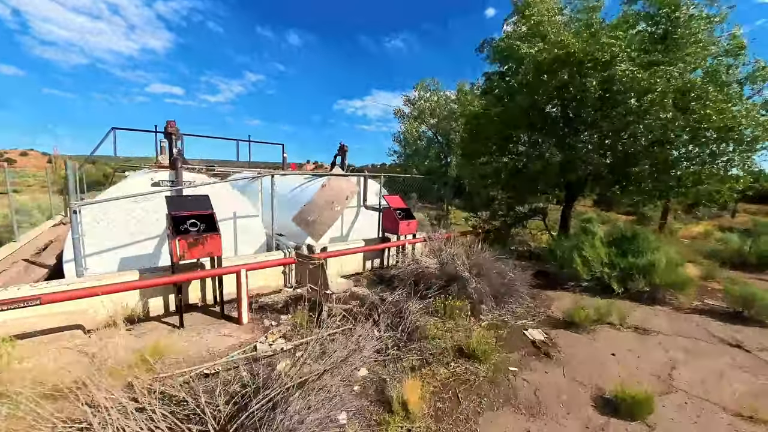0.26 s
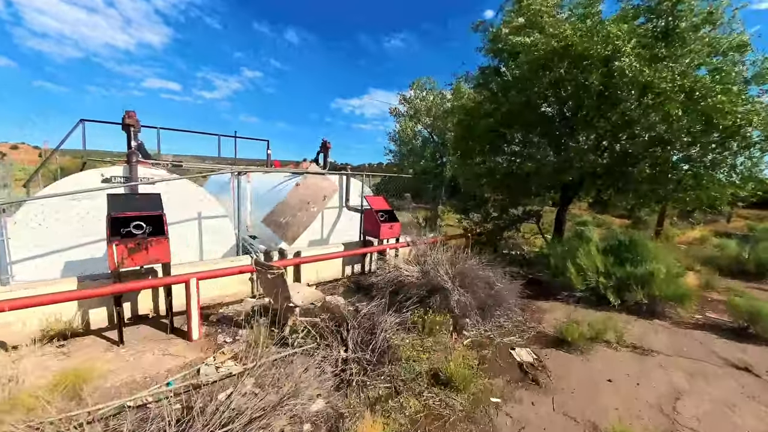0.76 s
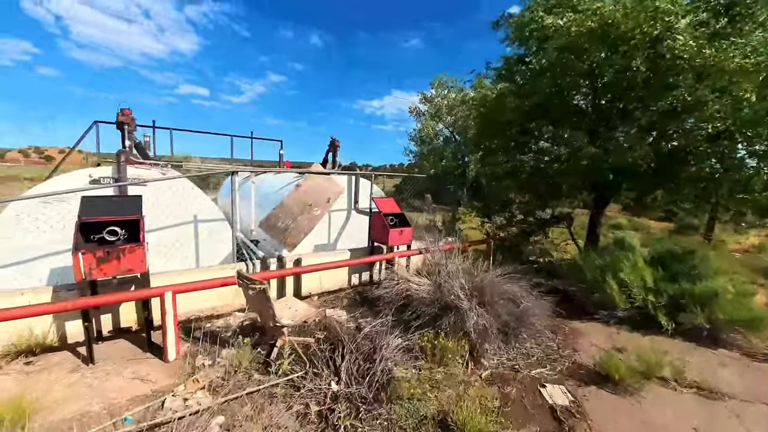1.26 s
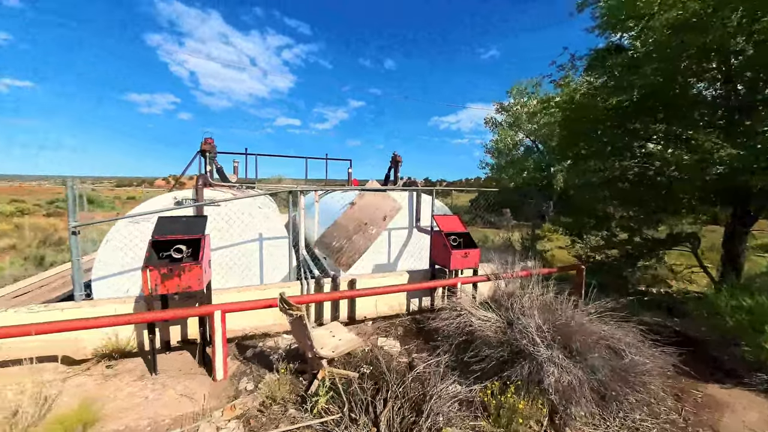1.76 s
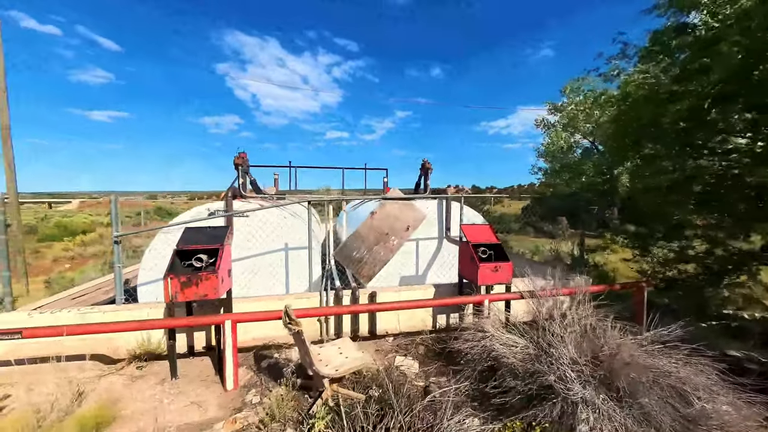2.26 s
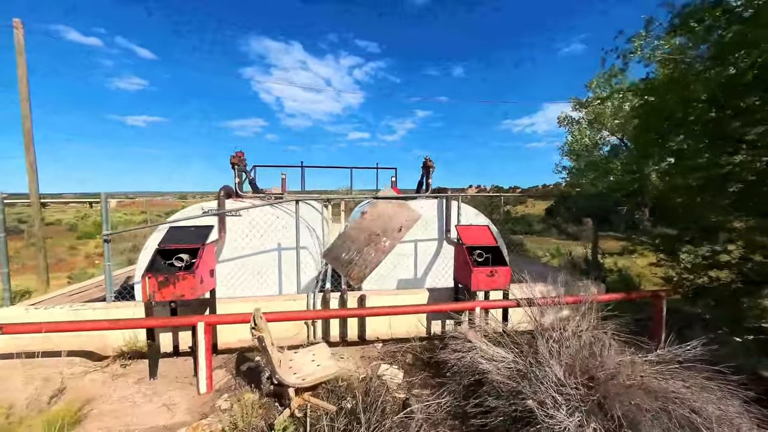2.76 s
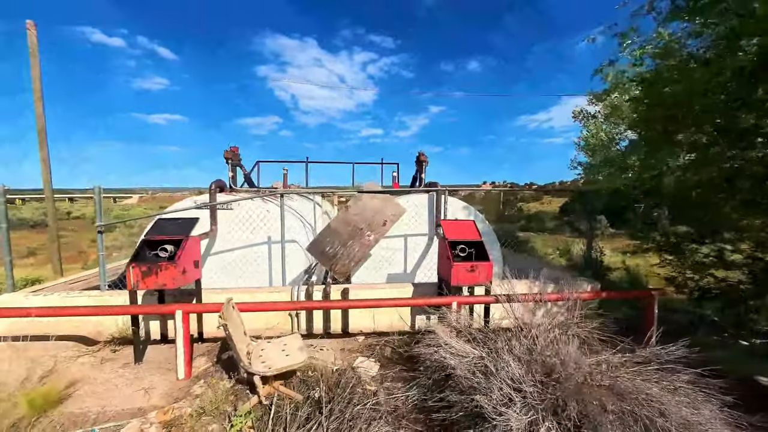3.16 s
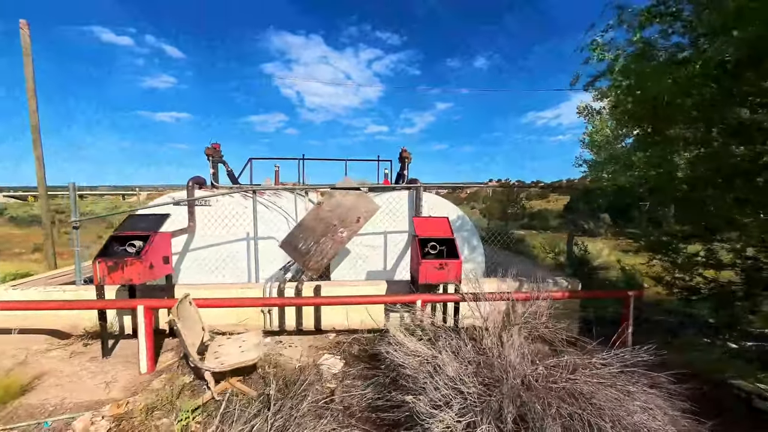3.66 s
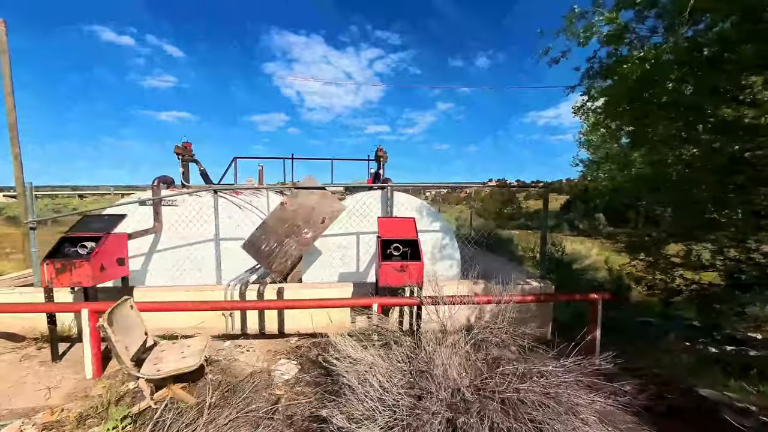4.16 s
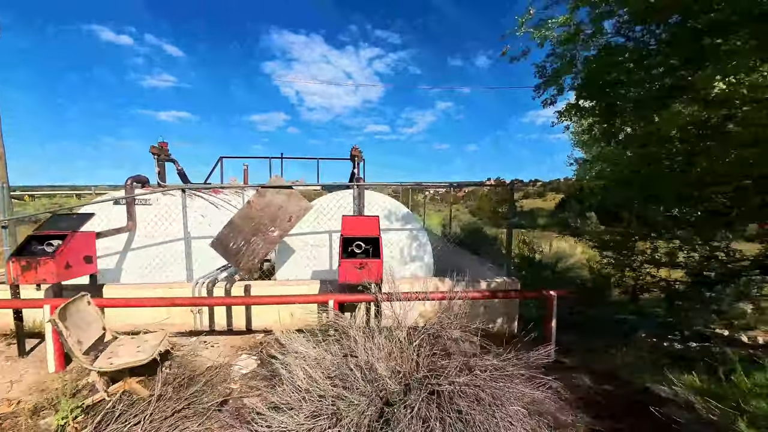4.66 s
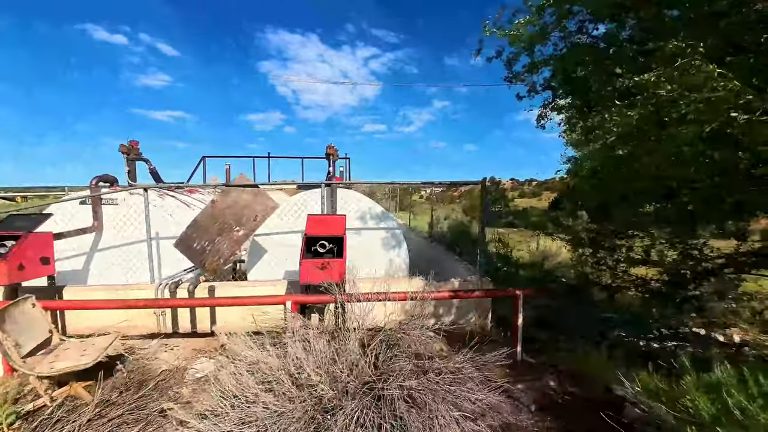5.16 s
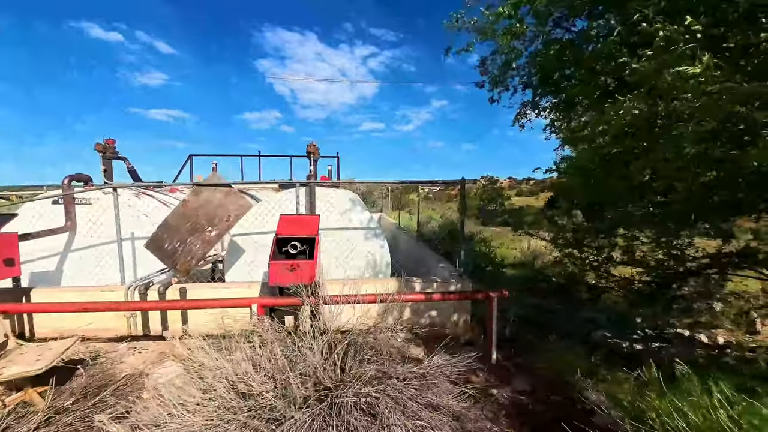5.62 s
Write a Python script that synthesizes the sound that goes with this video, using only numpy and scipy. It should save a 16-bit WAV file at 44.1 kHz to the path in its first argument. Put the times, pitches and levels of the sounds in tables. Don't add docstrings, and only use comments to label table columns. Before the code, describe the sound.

A mono outdoor capture dominated by low frequencies: a droning far-off engine with a wavering exhaust note, soft swelling road noise, and wind buffeting the microphone. Faint higher engine tones come and go. Twigs and grit click sparsely nearby, clustering after about four and a half seconds, when brighter leaf rustle rises. One blunt wind knock comes near the end; treble is thin and faintly hissy.

```python
import sys
import numpy as np
from scipy import signal
from scipy.fft import irfft
from scipy.io import wavfile
from scipy.ndimage import uniform_filter1d

SR = 44100
rng = np.random.default_rng(int(sys.argv[2]) if len(sys.argv) > 2 else 0)


def transcribe(signal):
    frames = np.atleast_2d(signal).T
    limited = np.clip(frames, -1, 1)
    pcm = np.round(limited * 32767).astype(np.int16)
    wavfile.write(sys.argv[1], SR, pcm)


def rack_gain(trim_db):
    fader = np.asarray(trim_db, float)
    return 10 ** (fader / 20)


N = 259749
T = np.arange(N) / SR

# t/s, f/Hz
CRANK_SPEED = [(0, 24.05), (1.2, 23.99), (1.5, 23.85), (2.0, 23.74), (3.3, 23.67), (3.6, 23.58),
               (4.2, 23.5), (5.2, 23.48), (5.89, 23.42)]
# t/s, level/dB
EXHAUST_NOTE = [(0, -24), (.6, -25), (.8, -21), (1.35, -20), (1.6, -24.5), (2.0, -21), (2.35, -16.5),
                (2.8, -18.5), (3.3, -18.5), (3.7, -19), (4.15, -20.5), (4.5, -20.5), (5.2, -20.5),
                (5.89, -23)]
HIGH_ORDERS = (11, 12, 13)
# order, start level/dB, midway level/dB, end level/dB
WEAK_ORDERS = [(4, -42, -38, -35.5), (5, -46.5, -36.5, -41), (8, -34, -37.5, -33.5), (9, -35.5, -42.5, -41)]
# t/s, length/s, rise/dB, f/Hz
FLANK_VIEWS = [(.35, 0.17, 9.5, 284), (.8, 0.11, 11, 284), (1.45, 0.17, 10, 284), (1.85, 0.17, 11, 279.5),
               (2.25, 0.29, 11, 274.8), (2.5, 0.39, 11, 306.4), (2.95, 0.27, 8, 275.6), (3.1, 0.27, 8, 308),
               (3.75, 0.25, 7, 311), (3.8, 0.27, 6, 256), (4.6, 0.32, 9.5, 279)]
# t/s, length/s, change/dB, f/Hz
EDDY_FADES = [(.14, 0.063, -2, 142), (.42, 0.08, -6, 90), (1.4, 0.049, -5, 71), (1.82, 0.052, -8.5, 142),
              (2.0, 0.08, -7, 71), (2.31, 0.14, -12, 71), (2.94, 0.066, -6.5, 142), (3.42, .04, -8, 142),
              (4.03, .12, -8.5, 71), (4.76, 0.078, -11.5, 100), (5.43, 0.056, -4.5, 142),
              (5.74, 0.043, -10, 71)]

# f/Hz, level/dB per Hz
RUMBLE_COLOUR = [(30, -17.5), (60, -4.5), (170, -3.5), (210, -7), (260, -14), (340, -15.5), (420, -30.5),
                 (600, -51.5)]
LOW_ROAR_COLOUR = [(200, -17), (350, -2), (450, -2.5), (650, -3.5), (850, -9), (1200, -24.5), (2000, -44.5)]
ROAR_COLOUR = [(500, -23.5), (800, -2), (1000, -1), (1450, -4.5), (1700, -9.5), (2200, -19.5), (3500, -46)]
HISS_COLOUR = [(1200, -18), (1900, -1.5), (2500, -2.5), (3400, -7), (4300, -15.5), (5500, -29),
               (7000, -43.5)]
# t/s, length/s, swell/dB, f/Hz where it swells most
VEHICLES = [(.05, 0.09, 3, 1494), (.47, 0.23, 7.5, 1480), (.75, 0.21, 5.5, 402), (1.05, 0.14, 4, 452),
            (1.15, 0.48, 2, 1810), (1.7, 0.11, -3, 450), (1.87, 0.13, 5, 2580), (2.08, 0.035, 3, 1510),
            (2.85, 0.13, 4, 1370), (3.5, 0.22, -3.5, 1630), (3.9, .2, 4.5, 490), (4.3, 0.29, 3.5, 2240),
            (4.65, 0.38, 4.5, 673), (4.73, 0.15, 5.5, 2820), (4.98, .1, 7.5, 1990), (5.38, 0.095, -1, 150),
            (3.35, 0.14, 2, 1200), (5.62, .15, -3.5, 700), (5.65, .12, -3, 200), (1.8, .1, 4, 190),
            (5.8, 0.47, -3, 2220)]

# f/Hz, level/dB per Hz
HEAVE_COLOUR = [(1, -14), (4, -7), (8, -4.5), (12, -1), (17, -5), (25, -19.5), (40, -41.5)]
BUFFET_COLOUR = [(10, -23), (18, 0), (22, -8.5), (30, -1), (50, -8), (80, -16), (150, -20.5), (300, -57)]
# t/s, length/s, rise/dB, f/Hz
WIND_GUSTS = [(.05, 0.057, 10.5, 18), (.13, 0.058, 12, 36), (.37, 0.048, 10.5, 36), (.44, 0.061, 13, 17.5),
              (.58, 0.056, 14.5, 28), (.7, 0.034, 3, 46), (1.12, 0.066, 6, 35), (1.33, .08, 6.5, 14),
              (2.05, 0.073, 3, 8.3), (2.3, 0.087, 0, 7.7), (2.77, .06, -11.5, 10), (2.9, .05, 5.5, 15),
              (3.08, .04, 3, 10), (3.23, 0.046, 8.5, 15), (3.35, 0.12, 6.5, 9.3), (3.46, .04, 7, 32),
              (3.75, 0.16, 7, 10), (4.05, 0.033, 5.5, 30), (4.31, 0.054, 8.5, 26), (4.5, 0.27, 7, 14),
              (4.68, 0.072, 4.5, 23), (5.0, 0.24, 8.5, 11), (5.05, 0.052, 9, 21), (5.18, 0.056, 5, 10),
              (5.3, 0.067, 8.5, 43), (5.39, 0.083, 12, 26), (5.71, 0.043, 13, 41), (5.81, 0.063, 19, 14.6)]
# t/s, height level/dB, length/s
GUST_SLAPS = [
    (5.4057, 5.5, 0.0021),
]

# f/Hz, level/dB per Hz
SOUGH_COLOUR = [(3200, -19), (4300, -1), (5000, -0.5), (6000, -4), (7500, -12), (8500, -28.5), (10000, -34)]
RUSTLE_COLOUR = [(5500, -30.5), (7000, -4), (8000, -4), (9650, -5.5), (10000, -14), (11500, -19),
                 (13000, -41.5)]
# t/s, length/s, rise/dB, f/Hz
LEAF_STIRS = [(.1, 0.28, 3.5, 4880), (.58, 0.16, 7.5, 5960), (.95, 0.29, 3.5, 5450), (1.2, .05, 1, 8500),
              (1.35, 0.16, 7, 6000), (1.7, .1, 0, 9000), (2.25, .08, 0.5, 9140), (2.45, 0.16, 8, 7000),
              (2.8, .1, 3, 5000), (3.15, 0.14, 4.5, 9050), (3.45, 0.12, -3, 4950), (3.62, 0.18, 6.5, 8950),
              (4.25, .2, 4, 6000), (4.5, .04, 9, 8040), (4.7, 0.14, 0.5, 4940), (4.94, .04, 4, 7000)]
# t/s, peak level/dB, lowest f/Hz, highest f/Hz, time to fall 60 dB/s
TWIG_TICKS = [(.098, -66.5, 7030, 11900, .008), (1.296, -67, 8100, 13000, .006),
              (1.373, -51, 1210, 9400, 0.017), (1.34, -48, 2500, 5560, 0.42), (1.855, -36, 3200, 3800, .06),
              (1.903, -42, 2200, 3800, 0.011), (2.205, -56, 6100, 11000, .008),
              (3.352, -50, 6100, 10500, 0.012), (4.469, -61, 5000, 10000, 0.0073),
              (4.493, -47.5, 4020, 13000, 0.013), (4.665, -47, 3080, 4540, 0.38),
              (5.235, -41, 2480, 3600, 0.17), (4.782, -36, 2620, 3300, .025),
              (4.983, -46, 2300, 5010, .015), (5.041, -40, 2000, 3600, 0.013),
              (5.402, -58, 2000, 9000, 0.011), (5.750, -56, 5022, 10500, 0.015)]


def truck():
    crank_hz, double_db = curve(CRANK_SPEED), curve(EXHAUST_NOTE)
    turns = 2 * np.pi * np.cumsum(crank_hz) / SR
    levels = {3: -20 - 0.9 * T, 6: double_db}
    for order in HIGH_ORDERS:
        echo_db = -1.5 * ((order * crank_hz - 284) / 24) ** 2
        flank_db = swells(FLANK_VIEWS, order * crank_hz.mean(), octaves=0.12)
        levels[order] = -43.5 + echo_db + flank_db
    for order, *db in WEAK_ORDERS:
        levels[order] = np.interp(np.arange(N), [0, N / 2, N], db)
    out = np.zeros(N)
    for order, db in levels.items():
        fade_db = swells(EDDY_FADES, order * crank_hz.mean(), octaves=0.6)
        level = rack_gain(db + fade_db - 0.03 + 0.8 * wander(rate_hz=11.0))
        sway = 0.03 * order * wander(rate_hz=3.0)
        start_phase = 2 * np.pi * rng.random()
        out += np.sqrt(2) * level * np.sin(order * turns + start_phase + sway)
    return out


def tyres():
    rumble_db, low_db, roar_db, hiss_db = (swells(VEHICLES, hz, octaves=0.81) for hz in (140, 520, 1150, 2600))
    rumble = rack_gain(-23 + rumble_db) * noise(RUMBLE_COLOUR, patchy_db=1.77, size=4096)
    low_roar = rack_gain(-34.1 + low_db) * noise(LOW_ROAR_COLOUR, patchy_db=-0.66)
    roar = rack_gain(-35 + roar_db) * noise(ROAR_COLOUR, patchy_db=0.76)
    hiss = rack_gain(-46.5 + hiss_db) * noise(HISS_COLOUR, patchy_db=1.26)
    flutter_db = 0.78 * wander(rate_hz=32)
    return rumble + low_roar + rack_gain(flutter_db) * (roar + hiss)


def wind():
    heave_db = -20.04 + swells(WIND_GUSTS, 11, octaves=1.3)
    buffet_db = -22.5 + swells(WIND_GUSTS, 25, octaves=1.3)
    swings = np.tanh(1.3 * noise(HEAVE_COLOUR, patchy_db=-1.0, size=8192))
    out = rack_gain(heave_db) * evened(swings)
    out += rack_gain(buffet_db) * noise(BUFFET_COLOUR, patchy_db=1.1, size=8192)
    for start, db, length in GUST_SLAPS:
        u = (T - start) / length
        out = out * (1 - np.exp(-(u / 6) ** 2))
        push = np.exp(-(u / np.where(u < 0, 0.6, 1.4)) ** 2)
        suck = 0.16 * np.exp(-(u + 1.4) ** 2 / 0.5)
        out += rack_gain(db) * (push - suck)
    return out


def leaves():
    near_tree_s, rise_s = 4.68, 0.25
    near_db = 13.5 / (1 + np.exp((near_tree_s - T) / rise_s))
    sough_db = -64 + 0.15 * near_db + swells(LEAF_STIRS, 5200, octaves=0.52)
    rustle_db = -80.9 + near_db + swells(LEAF_STIRS, 8700, octaves=0.52)
    sough = rack_gain(sough_db) * noise(SOUGH_COLOUR, patchy_db=2.5)
    return sough + rack_gain(rustle_db) * noise(RUSTLE_COLOUR, patchy_db=3.0)


def twigs():
    out = np.zeros(N)
    t = np.arange(6000) / SR
    for start, db, low_hz, high_hz, t60 in TWIG_TICKS:
        band = signal.butter(4, [low_hz, high_hz], "band", fs=SR, output="sos")
        burst = evened(signal.sosfilt(band, rng.standard_normal(len(t))))
        onset = np.minimum(t / (0.0008 + 0.043 * t60), 1)
        out[round(start * SR):][:len(t)] += burst * rack_gain(db - 60 * t / t60) * onset
    return out


def swells(rows, layer_hz, octaves):
    t = np.arange(0, N + 64, 64) / SR
    start, length, db, hz = np.transpose(rows)[:, :, None]
    distance = np.log2(layer_hz / hz) / octaves
    total = (db * np.exp(-((t - start) / length) ** 2 - distance ** 2)).sum(0)
    return np.interp(T, t, total)


def noise(colour, patchy_db, size=1024):
    frames, hz = 4 * N // size + 6, np.fft.rfftfreq(size, 1 / SR)
    a, b, patches = rng.standard_normal((frames, len(hz), 3)).T
    patches = uniform_filter1d(patches, size=14, axis=0)
    patches = evened(uniform_filter1d(patches, size=12, axis=1))
    f, db = np.transpose(colour)
    shape_db = np.interp(np.log(hz + 0.1), np.log(f), db, left=-150, right=-150)
    z = (a + 1j * b) * rack_gain(shape_db[:, None] + patchy_db * patches)
    return evened(signal.istft(z, nperseg=size, noverlap=size * 3 // 4)[1][:N])


def wander(rate_hz):
    hz = np.fft.rfftfreq(N + 1, 1 / SR)
    z = rng.standard_normal((len(hz), 2)) @ [1, 1j]
    return evened(irfft(z * np.exp(-(hz / rate_hz) ** 2), N + 1)[:N])


def curve(rows):
    t, value = np.transpose(rows)
    return np.interp(T, t, value)


def evened(x):
    return x / np.sqrt(np.mean(x ** 2) + 1e-20)


def scene():
    return (truck() + tyres() + wind() + leaves() + twigs())[None]


def gain_control(dry):
    lag = np.exp(-1 / (0.006 * SR))
    power = signal.lfilter([1 - lag], [1, -lag], dry ** 2)
    power_db = 10 * np.log10(power + 1e-9)
    over_db = 1.62 * np.logaddexp(0, (power_db + 18.0) / 1.58)
    cut_db = 0.44 * uniform_filter1d(uniform_filter1d(over_db, size=150), size=100)
    low = signal.sosfiltfilt(signal.butter(2, 350, fs=SR, output="sos"), dry)
    return low / rack_gain(cut_db - 2.5) + (dry - low) / rack_gain(0.2 * cut_db + 0.49)


def thin_treble(x):
    hz, _, z = signal.stft(x, SR, nperseg=1024, padded=True)
    power = uniform_filter1d(uniform_filter1d(abs(z) ** 2, size=5, axis=1), size=2, axis=2)
    level_db = 10 * np.log10(power + 1e-18)
    faint = (level_db < -99.0) & (hz[:, None] > 6000)
    thinned = signal.istft(z * np.where(faint, rack_gain(-6.5), 1), SR, nperseg=1024)[1][:, :N]
    hiss_db = -89.0 + 3.5 * (1.5 + np.tanh(4.0 * (wander(rate_hz=14.0) - 0.7)))
    return thinned + rack_gain(hiss_db) * rng.standard_normal(x.shape)


def low_pass(x):
    return signal.sosfilt(signal.butter(12, 15720, fs=SR, output="sos"), x)


def record(dry):
    mix = np.clip(thin_treble(gain_control(dry)), -0.998, 0.998)
    return low_pass(mix)


dry = scene()
out = record(dry)
transcribe(out)
```